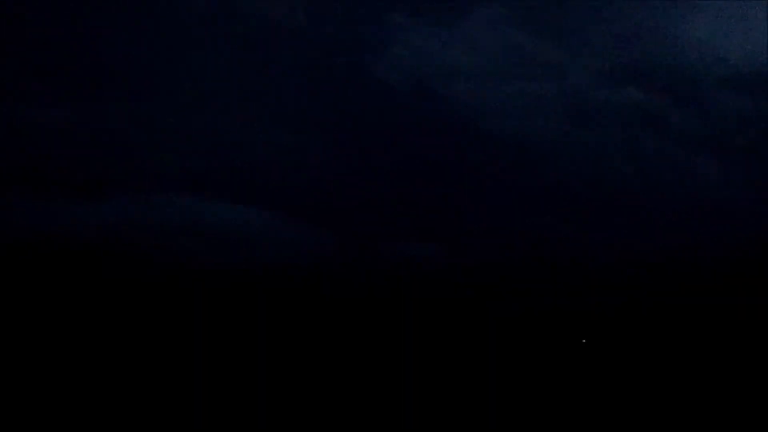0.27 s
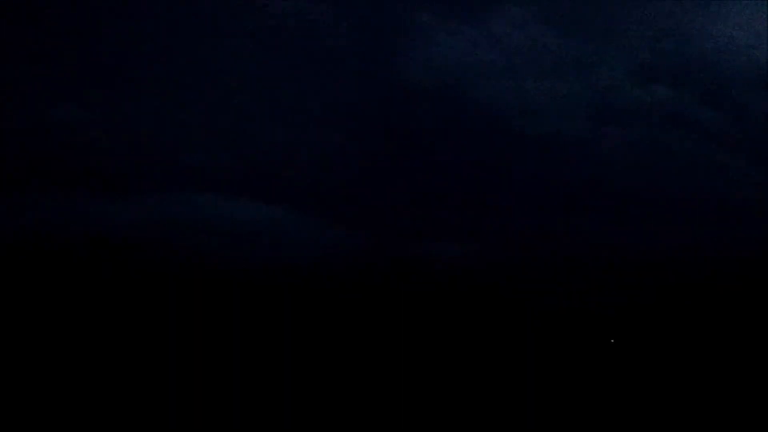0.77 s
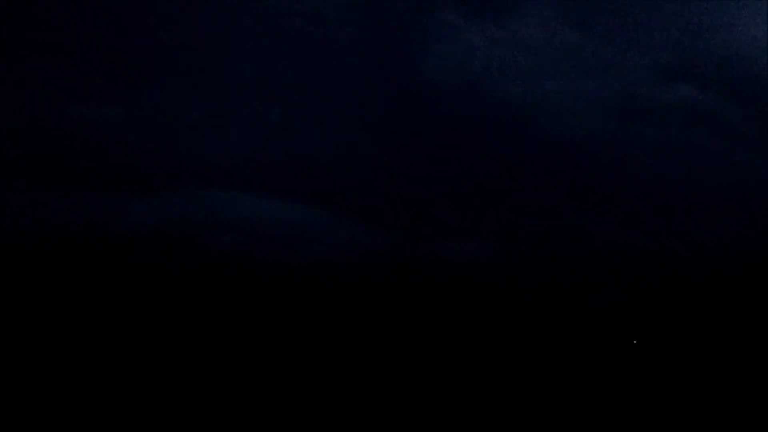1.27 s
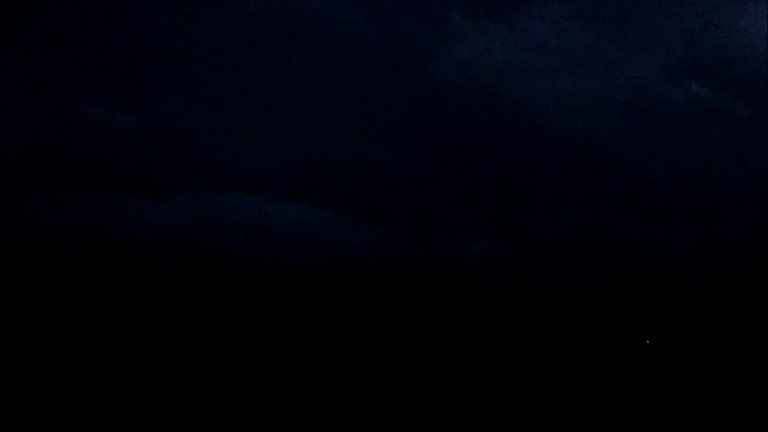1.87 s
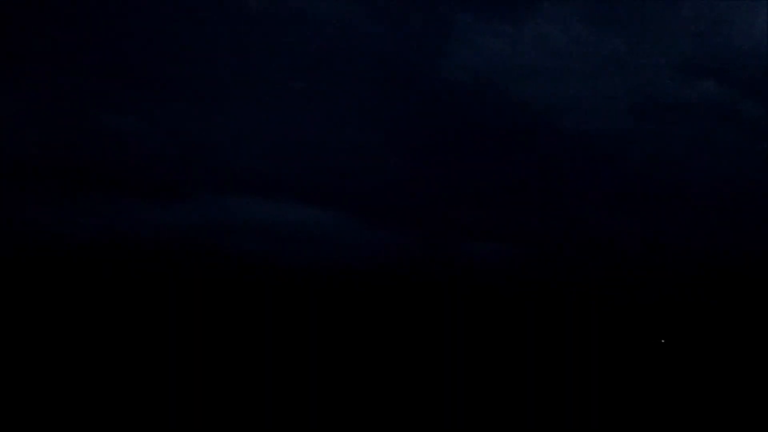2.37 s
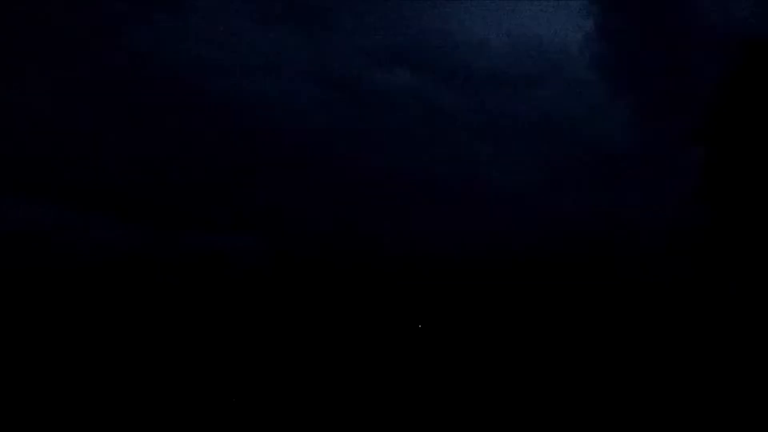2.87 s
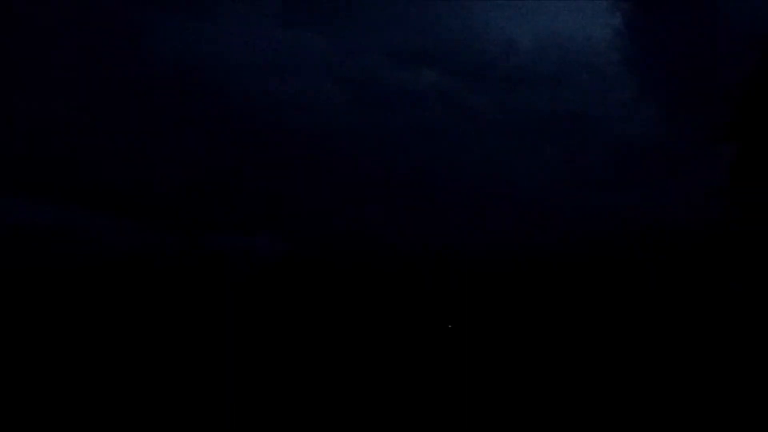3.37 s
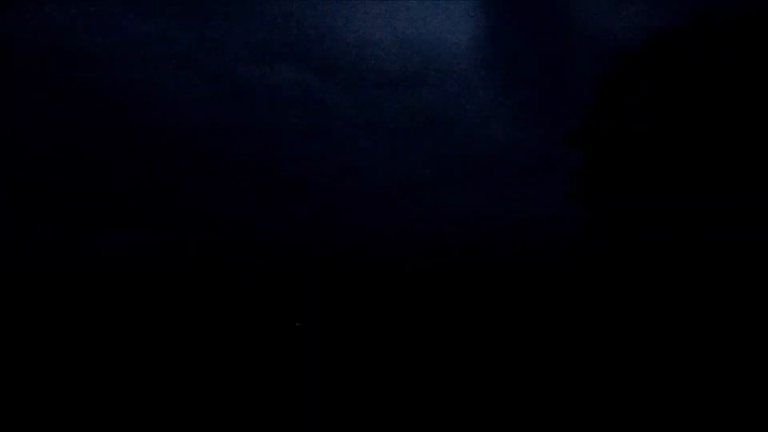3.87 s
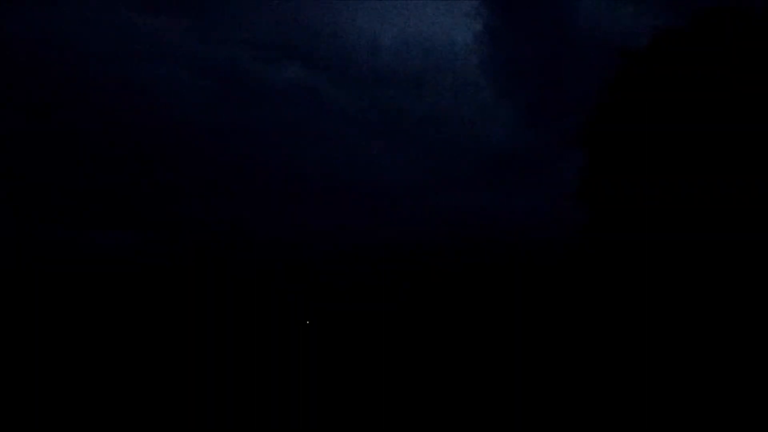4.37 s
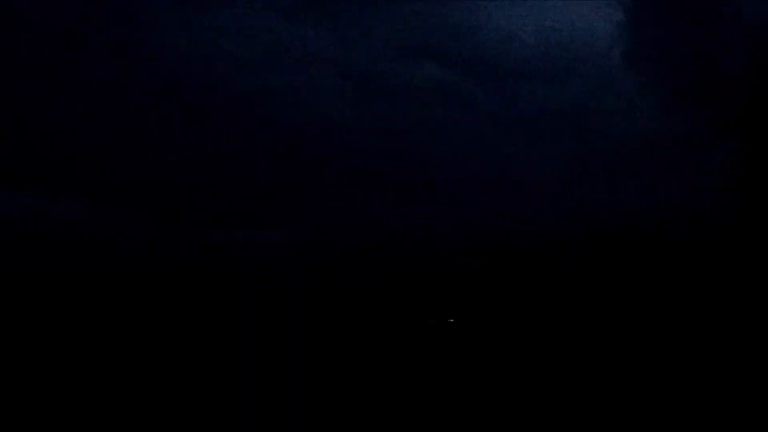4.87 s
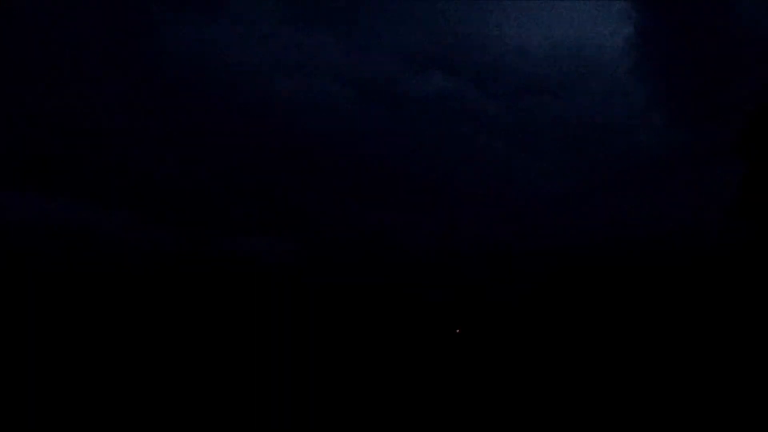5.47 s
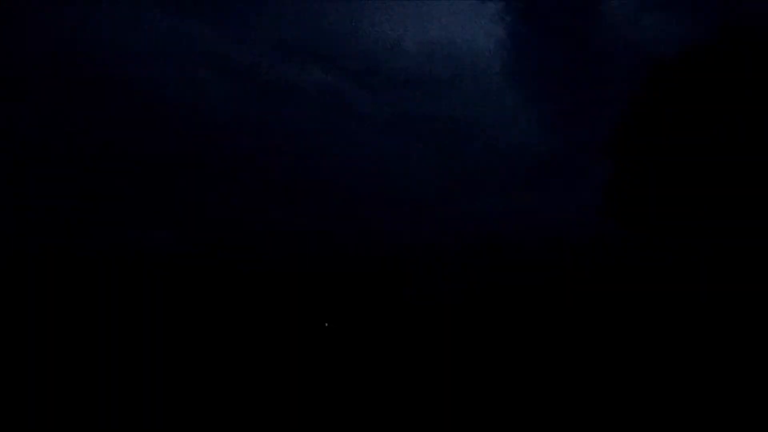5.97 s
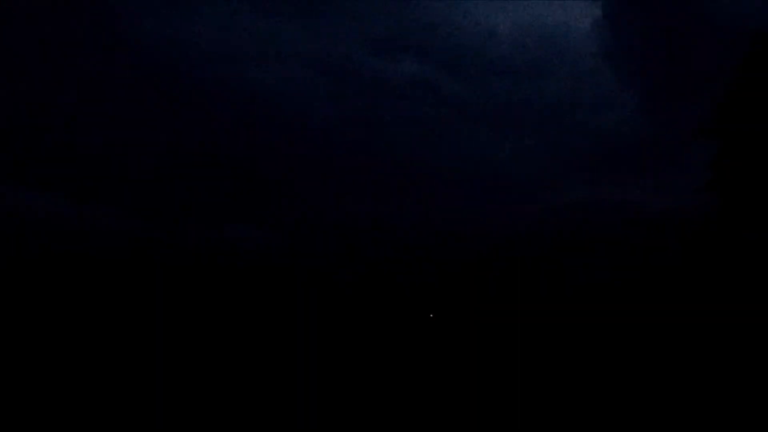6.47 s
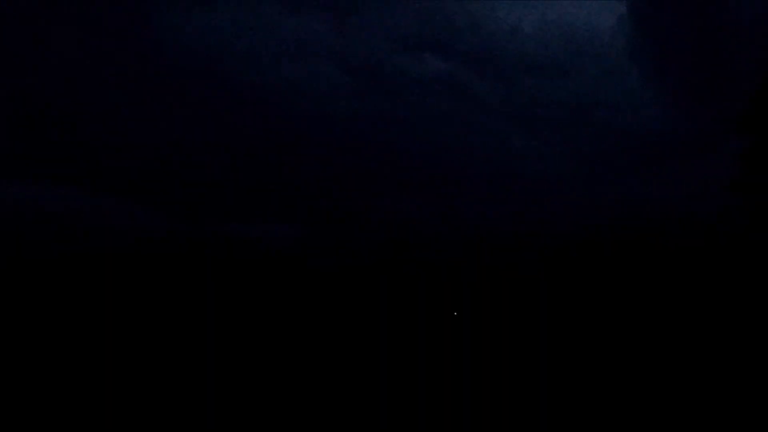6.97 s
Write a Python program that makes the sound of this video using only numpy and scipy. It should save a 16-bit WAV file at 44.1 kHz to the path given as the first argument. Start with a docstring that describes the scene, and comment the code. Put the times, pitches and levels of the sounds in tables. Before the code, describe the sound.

A distant engine throbs low in a katydid-filled night, then abruptly cuts out; hand rubbing and hard clicks on the camera follow, loudest at five seconds.

```python
"""Night outdoors: an engine idles some way off, its orders and noise throbbing amid soft rushes of noise.
Two katydids, a fast ticker and crickets sing throughout as pulsed noise and tone, over far traffic and leaves.
Early knocks swing out as low sines; then the engine sound stops abruptly and a faint low tone rings out.
A hand shifts on the camera: its rub is noise ringing in the case, its clicks are blows that ring the parts.
The hardest knock comes late, and the microphone's limiter ducks the sound after it."""
import sys
import numpy as np
from scipy import signal
from scipy.fft import rfft, irfft, next_fast_len
from scipy.io import wavfile

SR = 44100
rng = np.random.default_rng(int(sys.argv[2]) if len(sys.argv) > 2 else 0)


def to_wav(s):
    """Save 16-bit WAV."""
    ch = np.atleast_2d(s).T  # columns
    pcm = np.round(np.clip(ch, -1, 1) * 32767)  # PCM
    wavfile.write(sys.argv[1], SR, pcm.astype(np.int16))


N = 318887
T = np.arange(N) / SR
# resonances of the camera case; each sound scales the widths, and clicks also the levels:
# pitch_hz [Hz], width_hz [Hz], level_db [dB]
CASE_MODES = [(338, 85, 0), (660, 89, -6), (795, 38, 2), (1160, 94, 2.5), (1450, 43, 5), (1700, 43, 4.5),
              (2144, 140, -2.5), (2364, 25, -0.5), (3370, 190, -8.5), (3870, 120, -11.5),
              (4730, 540, -13.5), (5530, 500, -23.5), (6070, 170, -30.5), (7270, 610, -19)]


def amp(db):
    """Amplitude factor of a level in dB."""
    return 10 ** (np.asarray(db) / 20)


def evened(x):
    """Brings a sound to rms 1, over all its channels together."""
    return x / np.sqrt(np.mean(x ** 2) + 1e-20)


def curves(rows, silent=None):
    """Straight lines in time through each column after start_s; silent is the value outside the rows."""
    s, *columns = np.transpose(rows)
    return [np.interp(T, s, c, silent, silent) for c in columns]


def coloured(x, points):
    """Filters by a spectrum given as (Hz, dB), then brings it to rms 1."""
    size = next_fast_len(N)
    hz, db = np.transpose(points)
    bins_hz = np.fft.rfftfreq(size, 1 / SR)
    gain = amp(np.interp(np.log(bins_hz + 1), np.log(hz), db, -90, -90))
    return evened(irfft(rfft(x, size) * gain, size)[..., :N])


def drift(per_s, channels=1):
    """Lines between random points, so many a second, of rms 1."""
    steps = rng.standard_normal((channels, int(N / SR * per_s) + 2))
    return evened(np.array([np.interp(T * per_s, np.arange(len(s)), s) for s in steps]))


def pair(lag_s, same=1):
    """Noise at two microphone ports: partly shared, the shared part reaching the left port later by lag_s."""
    # left-right likeness, scaled by same: pitch_hz [Hz], likeness [0 to 1]
    likeness = [(60, 0.14), (300, 0.48), (1000, 0.72), (3000, 0.42), (7000, 0.018), (15000, 0.026)]
    size = next_fast_len(N)
    hz = np.fft.rfftfreq(size, 1 / SR)
    a, b = rfft(rng.standard_normal((2, size)))
    table_hz, shares = np.transpose(likeness)
    c = np.clip(same * np.interp(np.log(hz + 1), np.log(table_hz), shares), 0, 1)
    left = a * np.exp(-2j * np.pi * hz * lag_s)
    right = c * a + np.sqrt(1 - c ** 2) * b
    return irfft([left, right], size)[:, :N]


def sides(pan_db):
    """Gains of the two ports for a left minus right level in dB."""
    return amp(np.array([[.5], [-.5]]) * pan_db)


def bump(turns, centre, width):
    """A smooth swell once in every turn; centre and width are shares of a turn."""
    return np.exp(-.5 * (((turns - centre + .5) % 1 - .5) / width) ** 2)


def ring(x, hz, width):
    """One resonance at hz, width Hz wide."""
    r = np.exp(-np.pi * width / SR)
    return (1 - r) * signal.lfilter([1, 0, -1], [1, -2 * r * np.cos(2 * np.pi * hz / SR), r * r], x)


def add(mix, s, sound):
    """Lays a short sound into the mix from s seconds on."""
    part = mix[:, round(s * SR):][:, :sound.shape[1]]
    part += sound[:, :part.shape[1]]


def paced(bouts):
    """Turns counted so far, at an even pace in each bout; the count holds between bouts."""
    turns = np.zeros(N)
    for start, end, per_s, share in bouts:
        done = np.round(turns[round(start * SR)] - share) + share
        turns = np.where(T >= start, done + per_s * (np.minimum(T, end) - start), turns)
    return turns


def engine():
    """Locked orders throb once a firing, with an uneven rumble below and a pulsing rasp above."""
    # engine course: start_s [s], firing_hz [Hz], levels of orders 2, 3, 4 and 5 [dB], rumble_db [dB]
    course = [(0.0, 51.7, -36.5, -58, -60, -56, -44), (0.05, 50.2, -41, -43, -55, -70, -42),
              (0.19, 50.77, -35, -42, -50, -52, -42.5), (0.46, 50.9, -36, -40, -54, -56.5, -41.5),
              (0.52, 50.72, -38, -36, -46, -45, -31), (0.61, 50.9, -30.5, -41, -47, -52, -41),
              (0.64, 51.5, -31.5, -38, -50, -46, -31), (0.7, 51.16, -33.5, -45, -43, -50, -38.5),
              (0.99, 51.5, -27, -36, -50.5, -52, -40.5), (1.22, 51.83, -27, -42, -56, -41, -37),
              (1.28, 52.0, -27.5, -47, -43, -43.5, -31), (1.42, 52.4, -33, -50, -38, -35, -34.5),
              (1.67, 52.25, -33.5, -36.5, -45, -47.5, -40), (1.92, 52.6, -35, -41, -51, -50.5, -35.5),
              (2.16, 53.05, -32, -47, -43, -50, -37), (2.26, 53.5, -32, -39.5, -48.5, -77, -39),
              (2.39, 53.57, -33, -37.5, -44, -55, -35.5), (2.92, 54.15, -34.5, -38, -41.5, -53, -35.5)]
    # orders: multiple of the firing rate, level_db against the nearest of the four loud orders [dB]
    orders = [(1, -25), (2, 1), (3, -0.5), (4, 0), (5, -0.5), (6, -13), (7, -19), (8, -18.5), (9, -36),
              (10, -23.5), (11, -20), (12, -19.5), (13, -21)]
    # noise spectra: pitch_hz [Hz], level_db [dB per Hz]
    rumble_spectrum = [(25, -3), (45, 0), (100, 2.5), (150, -1), (190, -2.5), (270, -10.5), (340, -17),
                       (600, -30)]
    rasp_spectrum = [(210, -68), (350, -11.5), (473, -14.5), (631, 0), (896, -3), (1260, 0.5), (2410, -3.5),
                     (2910, -10), (3140, -2), (7000, -16.5), (9100, -36), (15400, -120)]
    stop_s = 2.934  # the engine sound stops abruptly here
    rasp_db, ring_hz, ring_db, ring_t60_s = -46, 123.8, -42, 0.68

    hz, *loud_db, rumble_db = curves(course)
    turns = np.cumsum(hz) / SR
    waver = drift(7, channels=2 * len(orders))
    # orders above 6 come forward up to 1.72 s, then drop back at once
    open_db = np.interp(T, (1.19, 1.72), (0, 14.336), right=0)
    hum = 0
    for i, (k, db) in enumerate(orders):
        nearest = min(max(i - 1, 0), len(loud_db) - 1)
        level_db = db + (k > 6) * open_db + loud_db[nearest] + 0.42 * waver[2 * i]
        spread = .6 * k ** 2  # the pipe spreads the orders in phase
        hum = hum + amp(level_db) * np.cos(2 * np.pi * k * turns - spread + .12 * waver[2 * i + 1])
    hum = np.sqrt(2) * np.array([np.roll(hum, 7), hum])  # left port 7 samples later

    rumble = amp(rumble_db + 1.8 * drift(25)) * coloured(pair(1.6e-4, same=.6), rumble_spectrum)

    pulsing = pair(1.6e-4) * (2.5 + bump(turns, 0, 0.19))
    rasp = amp(rasp_db + 1.5 * drift(15)) * coloured(pulsing, rasp_spectrum)
    treble = signal.sosfilt(signal.butter(2, 3800, "high", fs=SR, output="sos"), rasp)
    rasp = rasp + (amp(2.5 * drift(9)) - 1) * treble  # its treble swells unevenly

    after = np.maximum(T - stop_s, 0)
    tail = amp(ring_db - 60 * after / ring_t60_s) * np.sin(2 * np.pi * ring_hz * after)
    running = np.clip((stop_s - T) / 0.0024 + .5, 0, 1)
    return (hum + rumble + rasp) * running + tail


def rushes():
    """Noise in two broad resonances that swells and fades."""
    # rushes: start_s, peak_s, end_s [s], peak_db of the lower resonance [dB], low_hz, high_hz [Hz],
    # high_db against the lower [dB]
    swells = [(-.2, 0.055, 0.92, -47, 1710, 4130, -2.5), (0.59, 0.86, 1.2, -54.5, 840, 1280, 11),
              (1.07, 1.532, 1.77, -38, 674, 1160, 1), (1.137, 1.451, 1.87, -41.5, 270, 415, -5),
              (4.315, 4.67, 5.5, -37.5, 305, 189, -5.5), (5.073, 5.248, 5.4, -40, 372, 570, -14),
              (5.875, 5.952, 6.06, -41, 960, 1380, -6), (6.025, 6.228, 6.52, -45, 870, 1280, 1)]
    out = 0
    for start, peak, end, peak_db, low_hz, high_hz, high_db in swells:
        swell = np.sin(np.pi / 2 * np.interp(T, (start, peak, end), (0, 1, 0))) ** 1.93
        noise = amp(0.7 * drift(45)) * pair(0.00019, same=1.5)  # slightly grainy
        low, high = (evened(ring(ring(noise, hz, 0.6 * hz), hz, 0.95 * hz)) for hz in (low_hz, high_hz))
        out = out + amp(peak_db) * swell * (low + amp(high_db) * high)
    return out


def katydids():
    """Each wing stroke drags a scraper over uneven teeth; strokes come in pairs, before a far chorus."""
    # loudness before a common 2.5 dB lift: start_s [s], level_db [dB]
    loudness = [(0, -39.5), (.55, -43), (2, -41.5), (2.92, -42.5), (3.2, -40), (4, -41), (5, -40.5),
                (6, -41), (7.23, -40)]
    # wing resonance, then its overtones: pitch_hz [Hz], level_db [dB per Hz]
    wing_spectrum = [(5000, -28), (6500, -25), (8000, -12.5), (9100, 1), (9600, 2), (10300, 0.5),
                     (11200, -11.5), (12200, -29), (15900, -34)]
    top_spectrum = [(10300, -31), (11400, -8), (13000, -5), (14500, -0.5), (15900, 3)]
    # bouts: start_s, end_s [s], double strokes per s [1/s], share of a turn done at the start
    quick_bouts = [(0, .5, 11.0, .15), (.73, 1.95, 11.1, .66), (1.95, 2.93, 10.83, .21),
                   (2.93, 7.3, 11.0, .14)]
    slow_bouts = [(0, 2.93, 10.57, .1), (2.93, 7.3, 10.527, .37)]
    body_pan_db, top_pan_db = 4.5, 11.5  # left minus right
    top_db, quick_top_db = -5.5, -15  # overtone level; the quick singer is duller

    level_db, = curves(loudness)
    singers = []
    for turns, gain_db, side_db in ((paced(quick_bouts), 0, -1), (paced(slow_bouts), 0.5, 1)):
        effort = amp(0.43 * rng.standard_normal(200))[(2 * (turns + .18)).astype(int)]  # for each stroke
        stroke = effort * (bump(turns, 0, 0.059) + bump(turns, 0.32, 0.083))
        teeth = amp(.7 * np.minimum(rng.exponential(1, N), 3)) * (rng.random(N) < 900 / SR)  # 900 a second
        scrape = evened(signal.oaconvolve(teeth, np.hanning(40), "same")) + 1.14
        singers.append(amp(gain_db) * sides(side_db) * stroke * scrape * pair(1e-4, same=5))
    quick, slow = singers
    chorus = rng.standard_normal((2, N))  # many more, far away
    body_source = evened(quick + slow) + 0.26 * chorus
    top_source = evened(amp(quick_top_db) * quick + slow) + 0.33 * chorus
    body = sides(body_pan_db) * coloured(body_source, wing_spectrum)
    top = sides(top_pan_db) * coloured(top_source, top_spectrum)
    return amp(level_db + 2.5) * (body + amp(top_db) * top)


def ticker():
    """A high insect: one short tick each wing beat, a falling ring near 15 kHz."""
    # ticker course: start_s [s], level_db [dB], left_minus_right_db [dB], blur [amplitude factor]
    course = [(0, -51, -2, .55), (1, -47.5, 7, .55), (2.9, -45, 6, .45), (2.96, -43.5, -8, .22),
              (4, -42.5, -9, .25), (5, -42.5, -8, 0.31), (7.23, -48.5, -12, .28)]
    # bouts: start_s, end_s [s], ticks per s [1/s], share of a turn done at the start
    bouts = [(0, 2.93, 82.82, .8), (2.93, 4, 82.13, .25), (4, 7.3, 82.39, .14)]
    turns = paced(bouts)
    level_db, pan_db, blur = curves(course)
    number = (turns + .5).astype(int)
    start = rng.random(700)[number]  # each tick rings from its own phase
    beat = (turns + .5) % 1 - .5
    falling = np.cos(2 * np.pi * (186 * beat - 55 * beat ** 2 + start))
    chirp = falling + .8 * pair(-1e-4)
    size = amp(2.2 * rng.standard_normal(700))[number]
    ticks = size * (bump(turns, 0, 0.06) + 0.3 * bump(turns, -0.11, .05)) * chirp
    ticks = ticks + blur * pair(-0.00015)  # echoes and farther tickers blur into a steady buzz
    spectrum = [(11000, -44), (13300, -20), (14500, -15), (15500, -23), (15900, -15)]  # (Hz, dB per Hz)
    return amp(level_db) * sides(pan_db) * coloured(ticks, spectrum)


def crickets():
    """Distant trills: noise ringing near one pitch, throbbing about 30 times a second."""
    pitch_hz, level_db = 2954, -49
    throb = 1.8 + bump(30.0 * T + 0.28 * drift(3.19)[0], 0, 0.24)
    tone = ring(ring(pair(1.6e-4, same=1.2), pitch_hz, 220), pitch_hz, 300)
    return amp(level_db + 1.3 * drift(12)) * evened(tone * throb)


def air():
    """Far traffic, leaves and microphone hiss, as one slowly wavering coloured noise."""
    # spectrum: pitch_hz [Hz], level_db [dB per Hz]
    spectrum = [(18, -51), (30, -37), (106, -1), (592, -7.5), (828, -6), (1240, -8.5), (2310, -17.5),
                (2600, -50), (2930, -5), (3460, -10.5), (6760, -22), (9000, -5), (11700, -8.5),
                (19800, -120)]
    level_db = -49.5
    return amp(level_db + drift(2.5)) * coloured(pair(0.000182, same=1.0), spectrum)


def knocks():
    """A low push on the case that swings out in a few cycles of a decaying sine."""
    # knocks: start_s [s], peak_db before panning [dB], pitch_hz [Hz], t60_s [s], left_minus_right_db [dB]
    pushes = [(0.641, -30.5, 247, 0.068, -21), (1.292, -17, 121, 0.03, -11), (2.528, -34, 146, 0.013, -26),
              (2.601, -21.5, 160, 0.061, -11), (2.631, -20, 137.2, 0.046, -15),
              (2.697, -25.5, 123, 0.024, -13), (2.76, -26.5, 176, 0.1, -9), (3.7446, -12.5, 229, 0.014, -5),
              (3.7534, -19.5, 427, 0.0051, 1), (3.78, -25, 373, 0.035, -9), (4.02, -29, 370, 0.011, -4),
              (4.035, -27.5, 355, 0.057, -4), (5.113, -31.5, 118, 0.16, -27), (5.289, -33, 330, 0.022, -2),
              (5.3031, -1, 151, 0.051, -2), (5.352, -24, 340, .04, -5), (5.4805, -18.5, 194, 0.031, -23),
              (5.498, -26.5, 157, 0.052, -32), (5.529, -23, 187, 0.053, -26.5),
              (5.547, -23.5, 172, 0.029, -23), (5.559, -22.5, 103, 0.1, -23.5),
              (5.589, -27.5, 112, 0.08, -19), (5.628, -32.5, 89, 0.15, -19), (5.863, -22.5, 255, 0.019, -8)]
    out, t = np.zeros((2, N)), T[:SR // 4]
    for s, peak_db, hz, t60, pan_db in pushes:
        onset = np.minimum(t * hz / 0.63, 1)  # full after 0.63 of a cycle
        push = -np.sin(2 * np.pi * hz * t) * amp(-60 * t / t60) * onset
        add(out, s, amp(peak_db) * sides(pan_db) * push / abs(push).max())
    return out


def clicks():
    """One blow and a rattle of noise ring at the pitch of the struck part, in a high ping and in the case."""
    # clicks: snap_s at mid-rise [s], peak_db before panning [dB], pitch_hz [Hz],
    # ping_db against the main ring [dB], t60_s of the rattle [s], left_minus_right_db [dB],
    # blow_db of the first blow over the rattle [dB]
    strikes = [(1.652, -31, 1780, -20, 0.023, -6, 15), (2.932, -48, 795, -18, 0.086, -1, 2),
               (2.942, -40, 556, -25, .06, -7, 3), (2.955, -45, 340, -30, 0.075, -6, 3),
               (3.741, -36, 1300, 5, 0.022, -1, 8), (3.759, -12, 2140, 6.5, 0.039, -4.5, 17.5),
               (3.7667, -17, 1310, -16, 0.026, 3, 17), (3.7738, -23, 810, 2, 0.023, -16, 15),
               (4.066, -27, 1140, 8, 0.023, -15, 17), (4.071, -16.5, 1240, -4, 0.044, -1.5, -2),
               (4.077, -21, 854, 0, 0.059, -5, 15), (4.218, -37.5, 1340, -22, 0.044, -8, 11),
               (5.108, -29.5, 1310, -25, 0.035, -2, 8), (5.3042, -5.5, 890, -17, 0.07, -4, 14),
               (5.3062, -5, 3180, 4, 0.043, -3, -1), (5.3075, -8.5, 675, -25, 0.058, -11, 10),
               (5.31, -4, 1700, -13, 0.065, 5.5, 1), (5.314, -3.5, 810, 5, 0.037, -6, 14),
               (5.332, -10.5, 3100, 7, 0.024, -5, 15), (5.346, -20, 5800, -4, 0.016, -5, 18),
               (5.355, -27, 940, -15, 0.11, -5, 6), (5.458, -29, 3000, -6, 0.074, -1, 21),
               (5.5082, -30, 1400, -39, 0.034, 10, 24), (5.7883, -16.5, 2250, -17, 0.035, -4, 10),
               (5.793, -45, 2420, -30, .03, 0, 28), (5.883, -32, 820, -26, 0.043, 3, 16),
               (5.944, -31.5, 1600, -29, 0.096, 4, 20), (5.978, -38, 980, -30, 0.04, 5, 15),
               (6.152, -34.5, 980, -30, 0.049, -4, 8), (6.205, -32, 1650, -30, .09, 0, 8),
               (6.222, -33.5, 1480, -30, 0.11, 4, 14), (6.264, -32, 1310, -30, .08, -4, 9),
               (6.292, -36, 1450, -30, 0.064, 10, 20), (6.353, -35, 1320, -30, 0.11, -1, 19),
               (6.4767, -28.5, 1300, -29, 0.034, 9, 33), (6.481, -37, 690, -30, .03, -7, 12),
               (6.488, -42, 700, -30, .04, -5, 16), (7.1066, -18, 2530, -39, 0.015, 0, 34),
               (7.105, -35, 3370, -41, 0.027, -11, 18), (7.11, -28.5, 1560, -29, 0.035, 9, 6),
               (7.116, -34, 890, -30, 0.07, -6, 13), (7.194, -38.5, 1790, -11, 0.027, -2, 16),
               (7.202, -40.5, 704, -30, .025, -6, 10)]
    lead_s, lead_db = .01, -15.5  # faint noise leads in for 10 ms before the snap
    rise_s, ping_hz = .0015, 4710
    ping_fade = 1.7  # extra decay of the ping, as a multiple of the rattle's
    lag = 14  # samples by which the left port is later

    out, t = np.zeros((2, N)), T[:SR // 8]
    since = np.maximum(t - lead_s, 0)
    blow = np.array([np.arange(len(t)) == round(lead_s * SR) + late for late in (lag, 0)])
    for row, (a, b) in zip(strikes, rng.standard_normal((len(strikes), 2, len(t)))):
        s, peak_db, hz, ping_db, t60, pan_db, blow_db = row
        rise = np.interp(t, (0, lead_s, lead_s + rise_s), (0, amp(lead_db), 1))
        rattle = np.array([np.roll(a, lag), 0.5 * a + 0.82 * b]) * amp(-60 * since / t60) * rise
        snap = rattle + amp(blow_db) * blow
        main, ping = (evened(ring(ring(snap, f, 0.14 * f), f, 0.54 * f)) for f in (hz, ping_hz))
        case = evened(sum(amp(0.78 * db) * ring(ring(snap, f, 1.55 * width), f, 6 * width)
                          for f, width, db in CASE_MODES))
        ping_gain = amp(ping_db - 60 * ping_fade * since / t60) * (t > lead_s)
        sound = main + ping_gain * ping + amp(-3.5) * case
        level = amp(peak_db) / abs(sound.mean(0)).max()
        add(out, s - lead_s - rise_s / 2, level * sides(pan_db) * sound)
    return out


def hand():
    """Skin slips over the case in small uneven jerks with dry grains of friction; the grip adds low noise."""
    # moves: full_s when full strength is reached [s], rise_s, hold_s, fall_s [s], rub_db [dB],
    # low grip_db [dB], treble tilt [dB per octave]
    moves = [(3.094, 0.061, 0.018, 0.076, -60.5, -70, 14.5), (3.75, 0.036, 0.02, 0.079, -24.5, -33, -1.5),
             (3.823, 0.035, 0.17, 0.15, -41.5, -47, -0.5), (4.089, 0.22, 0.038, 0.05, -33.5, -40.5, -0.5),
             (4.223, 0.13, 0.0092, 0.081, -42.5, -43.5, -1.5), (4.457, 0.13, 0.076, 0.13, -36, -45, 1),
             (4.73, 0.45, 0.044, 0.32, -29.5, -38.5, 0.5), (4.985, 0.12, 0.031, 0.075, -29, -32.5, 0.3),
             (5.172, 0.13, 0.16, 0.055, -31, -28, 1), (5.315, 0.13, 0.045, 0.12, -20.5, -22.5, -2.1),
             (5.51, 0.093, 0.0076, 0.087, -41.5, -32.5, -6.5), (5.627, 0.04, 0.047, 0.017, -68, -47, -4),
             (5.793, 0.088, 0.0092, 0.056, -37.5, -48.5, -1.3), (5.89, 0.13, .01, 0.1, -44.5, -43, -1.5),
             (5.96, .07, .01, 0.12, -43.5, -67, -0.5), (6.27, 0.1, 0.027, 0.04, -43.5, -74, 2),
             (6.467, 0.1, 0.011, 0.1, -44.5, -78, 0), (6.579, 0.073, 0.012, 0.055, -42.5, -68, 0),
             (7.11, 0.13, .01, 0.2, -57, -49, 2)]
    # resting hand: start_s [s], rub_db [dB], low grip_db [dB]
    rest = [(2.94, -53, -52), (3.15, -63, -56), (3.4, -58.5, -57), (3.7, -80, -57.5), (3.9, -72, -50),
            (5.85, -61, -58.5), (6.05, -50.5, -77), (6.55, -61, -68), (6.7, -52, -64.5), (7.23, -62, -60)]
    # spectra of grip noise and scratch: pitch_hz [Hz], level_db [dB per Hz]
    grip_spectrum = [(25, -26), (50, -2.5), (100, -0.5), (170, 0), (250, -6.5), (400, -21)]
    scratch_spectrum = [(2800, -20), (4000, 3), (5500, -19), (7500, -7), (10000, -15)]
    move_shape = 1.82  # power that bends each rise and fall
    scratch_db, grains_per_s, lag_s = -22, 1200, .00033

    # rub and grip are powers; the tilt is weighted by rub power
    rub, grip = amp(curves(rest, -120)) ** 2
    tilt = np.zeros(N)
    for s, rise, hold, fall, rub_db, grip_db, tilt_db in moves:
        corners = np.cumsum([s - rise, rise, hold, fall])
        power = np.interp(T, corners, (0, 1, 1, 0)) ** (2 * move_shape)
        rub = rub + amp(2 * rub_db) * power
        grip = grip + amp(2 * grip_db) * power
        tilt = tilt + tilt_db * amp(2 * rub_db) * power
    tilt = tilt / rub

    jerks_db = 1.5 * drift(18) + 1.8 * drift(70) + 1.5 * drift(300)
    slips = pair(lag_s, same=1.14)
    modes = []
    for k, (hz, width, db) in enumerate(CASE_MODES):
        own_slips = np.roll(slips, 999 * k, 1)
        damped = ring(ring(own_slips, hz, 2.6 * width), hz, 6.5 * width)  # the hand damps the case
        modes.append(amp(db) * amp(jerks_db) * damped)
    skin = sum(amp(tilt * np.log2(hz / 1000)) * mode for (hz, _, _), mode in zip(CASE_MODES, modes))
    skin = skin / np.std(sum(modes))

    sizes = amp(1.8 * np.minimum(rng.exponential(1, N), 4))
    grains = sizes * (rng.random(N) < grains_per_s / SR) * rng.choice([-1, 1], N)
    grains = np.array([np.roll(grains, round(lag_s * SR)), grains])
    scratch = amp(scratch_db + jerks_db) * coloured(grains, scratch_spectrum)

    shake = amp(3.5 * drift(40)) * coloured(pair(0, same=1.0), grip_spectrum)
    return np.sqrt(rub) * sides(-3.5) * (skin + scratch) + np.sqrt(grip) * sides(0.095) * shake


def scene():
    """All sounds as they reach the microphone."""
    return engine() + rushes() + katydids() + ticker() + crickets() + air() + knocks() + clicks() + hand()


def record(dry):
    """The microphone loses deep bass; a limiter ducks peaks and recovers; overload clips; treble is cut."""
    edge_hz = 15830
    dry = signal.sosfilt(signal.butter(2, 40, "high", fs=SR, output="sos"), dry)
    peak_db = 20 * np.log10(abs(dry).max(0) + 1e-9)
    fall = T * 110  # the held peak falls by this many dB a second
    held_db = np.maximum.accumulate(peak_db + fall) - fall
    over_db = np.maximum(held_db + 7.5, 0)  # threshold at -7.5 dB
    ducked = dry / amp(0.91 * signal.lfilter([.002], [1, -.998], over_db))
    taps = signal.firwin(511, edge_hz, window=("kaiser", 9), fs=SR)
    return signal.oaconvolve(np.clip(ducked, -.96, .96), taps[None], "same")


dry = scene()
out = record(dry)
to_wav(out)
```